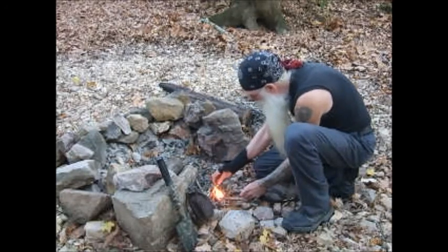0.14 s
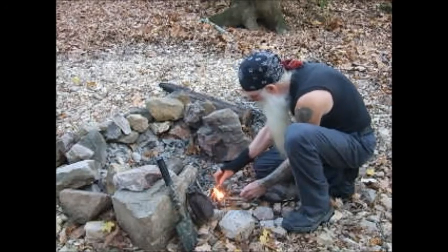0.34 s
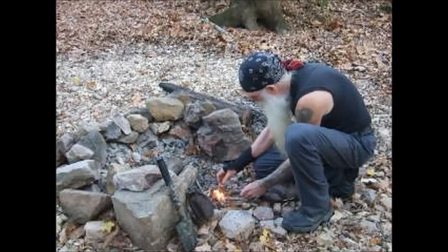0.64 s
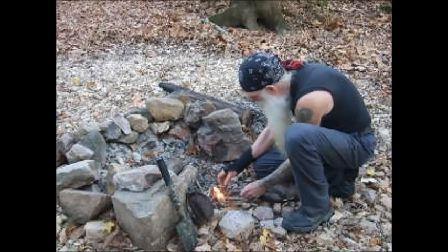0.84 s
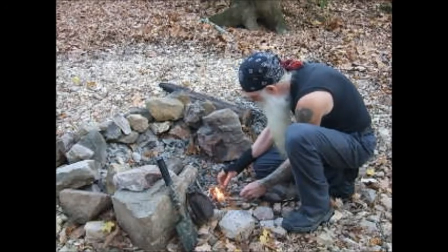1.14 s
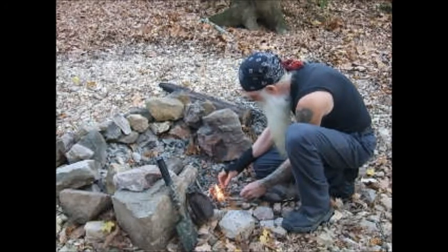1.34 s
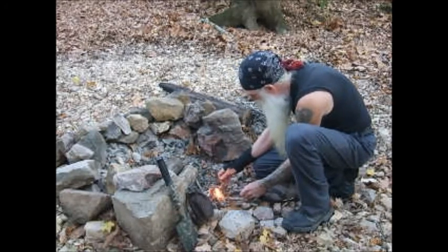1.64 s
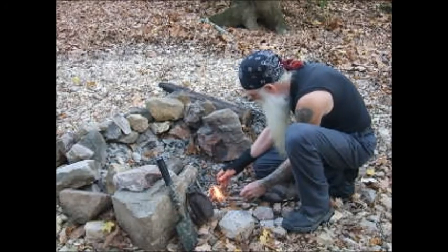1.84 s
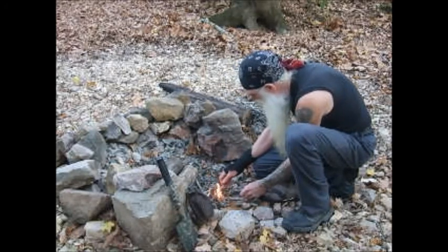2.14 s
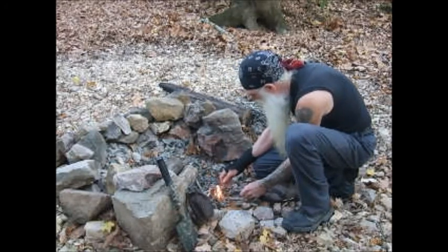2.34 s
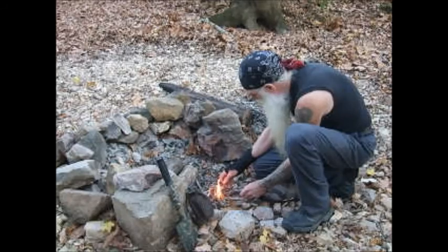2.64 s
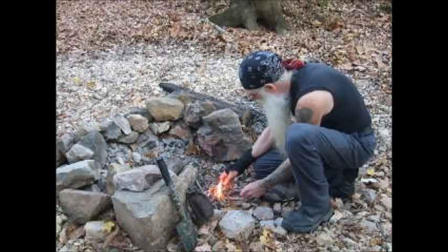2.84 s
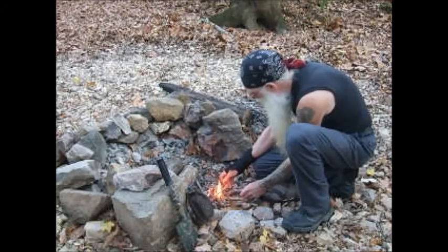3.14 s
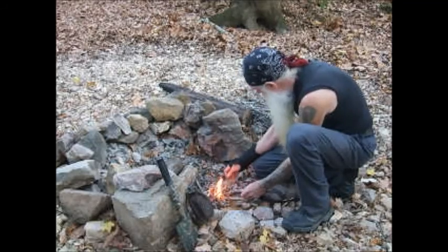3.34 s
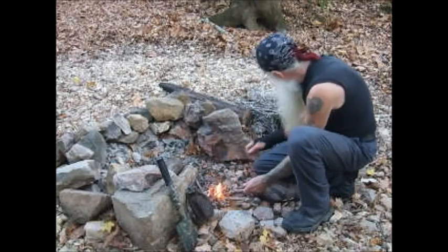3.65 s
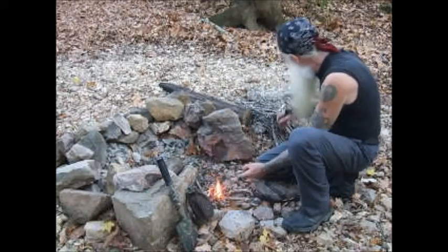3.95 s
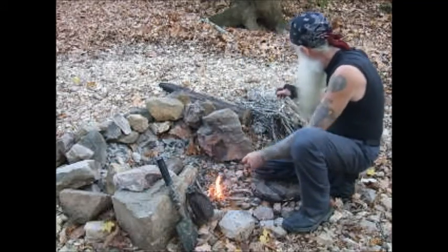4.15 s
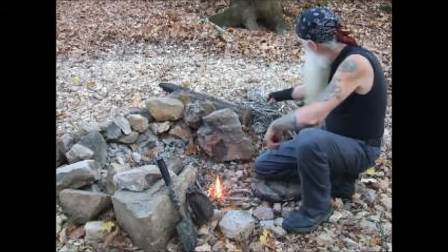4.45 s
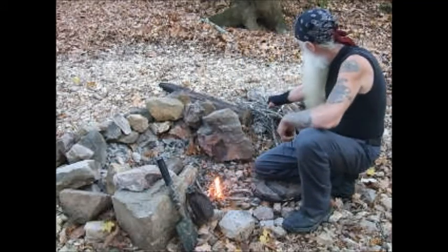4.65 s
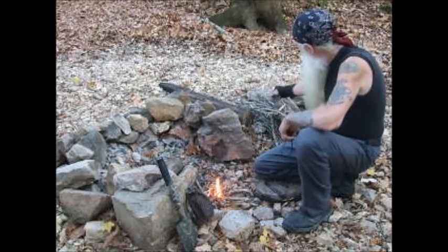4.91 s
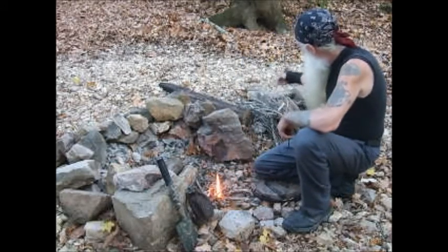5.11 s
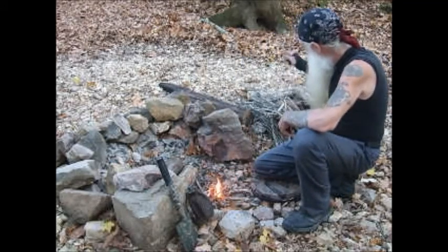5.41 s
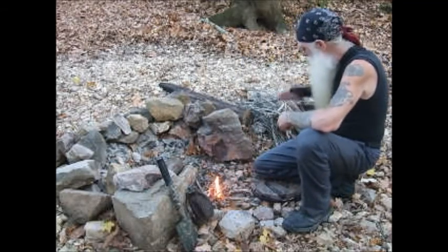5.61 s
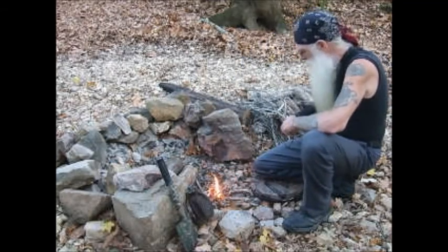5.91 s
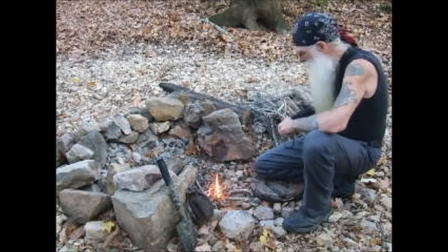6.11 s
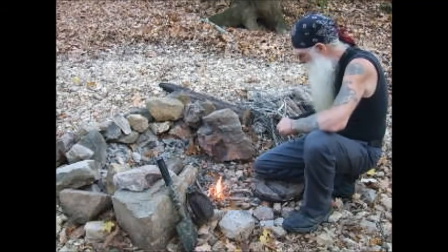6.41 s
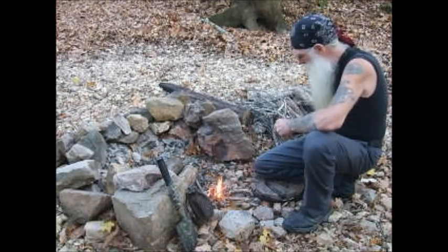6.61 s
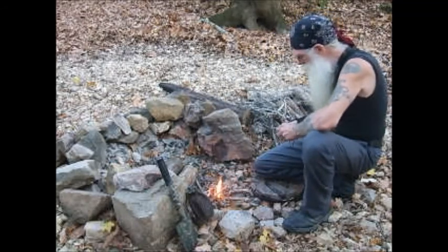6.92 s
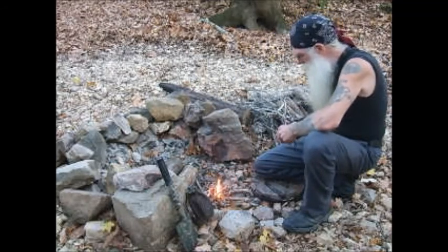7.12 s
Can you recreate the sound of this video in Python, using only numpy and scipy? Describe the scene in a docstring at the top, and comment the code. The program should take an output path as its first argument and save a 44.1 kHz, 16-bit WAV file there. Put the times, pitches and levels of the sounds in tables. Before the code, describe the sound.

A high cricket chorus in the woods, with faint fire crackles, someone rummaging through dry twigs, then a sharp, echoing crack.

```python
"""Tree crickets trill by rubbing their wings in a wood at dusk, a few near ones over a far chorus.
A small kindling fire ticks, and from 1.6 s a few thin whistles come from the trees.
At 3.4 s someone shifts on dry leaves, then reaches into a pile of twigs, which rustle, click and bump.
A stick is pulled free and bent. Near 6.9 s it breaks with a sharp snap that rings back from the trees."""
import sys
import numpy as np
from scipy import signal
from scipy.fft import rfft, irfft
from scipy.io import wavfile
from scipy.ndimage import uniform_filter1d, map_coordinates

SR = 44100
rng = np.random.default_rng(int(sys.argv[2]) if len(sys.argv) > 2 else 0)


def dump_mix(stems):
    """Bounce the given channels to the path in sys.argv[1] as a 16-bit WAV at rate SR."""
    frames = np.atleast_2d(stems).T  # one column per channel
    limited = np.clip(frames, -1, 1)  # hard clip at full scale
    pcm = np.round(limited * 32767).astype(np.int16)
    wavfile.write(sys.argv[1], SR, pcm)


N = 320607
TIME = np.arange(N) / SR
TREBLE_LIMIT_HZ = 8100

# Movements among twigs and leaves: kindling settles, a person shifts and rummages, a stick is bent.
# Each row: start in seconds, length in seconds, relative crackle level in dB, relative scrape level in dB.
MOVEMENTS = [(.145, .015, -43, -65), (.21, .03, -52, -53), (3.395, .08, -44, -43.5), (3.48, .03, -37, -50),
             (3.55, .04, -41, -51), (3.88, .15, -45, -61), (4.22, .06, -41.5, -59), (4.63, .07, -39.5, -51),
             (4.92, .3, -41.5, -49.5), (5.26, .025, -42, -45), (5.35, .06, -44, -53), (5.7, .38, -53, -61),
             (6.55, .08, -45, -72)]
# The bright tone of crackling dry wood. Each row: frequency in Hz, relative level in dB.
CRACKLE_SPECTRUM = [(1500, -26.5), (3500, -1.5), (5000, 1), (6500, 5), (7500, 7.3), (8200, -15)]


def near_crickets(echo_db=-8, faint_db=-48):
    """The nearest crickets sing overlapping trills; faint ones are farther off and arrive more as echo."""
    # Each cricket's own song. Each entry: pitch in Hz, wing strokes per second, trill length in seconds.
    songs = {"high": (4315, 39.8, .37), "bright": (4235, 38.8, .38), "middle": (4160, 39.6, .32),
             "low": (4078, 38.4, .31), "deep": (3675, 37.9, .38)}
    # Who sings when. Each row: start in seconds, name of the cricket, level in dB.
    trills = [(-.08, "low", -40), (.107, "bright", -39.5), (.16, "low", -42), (.62, "bright", -43.5),
              (.86, "low", -43.5), (.99, "high", -40.5), (1.06, "middle", -44), (1.061, "deep", -49),
              (1.48, "low", -44), (1.638, "high", -42), (1.66, "bright", -37.5), (1.855, "low", -39),
              (2.21, "high", -42), (2.32, "low", -42), (2.43, "bright", -37.5), (2.845, "low", -40),
              (3.035, "middle", -36.5), (3.563, "high", -41.5), (3.565, "low", -38), (3.569, "deep", -51.5),
              (3.941, "bright", -38), (4.14, "bright", -41), (4.38, "low", -40.5), (4.7, "bright", -43),
              (4.915, "middle", -36), (4.97, "high", -39.5), (5.33, "low", -43), (5.557, "deep", -51.5),
              (5.692, "bright", -35.5), (5.742, "high", -39.5), (5.835, "low", -38), (6.0, "middle", -43),
              (6.32, "high", -40), (6.4, "middle", -35.5), (6.5, "bright", -42.5), (7.012, "deep", -51.5),
              (7.097, "bright", -38)]
    out = np.zeros(N)
    for start, cricket, db in trills:
        hz, strokes_per_s, length = songs[cricket]
        song = np.pad(trill(length, hz, strokes_per_s), (0, SR // 10))
        echo_gain = amp(echo_db) + amp(faint_db - db) ** 2
        heard = song + echo_gain * woods(song, echo_s=.18)
        add(out, start, amp(db) * heard * np.std(song) / np.std(heard))
    return out


def trill(length, hz, strokes_per_s, sounding_share=.74, sag=.03, climb_hz_per_s=130):
    """Each closing of the wings scrapes out one pulse of tone, whose pitch sags as the wings slow."""
    t = TIME[:max(round(length * SR), 256)]
    strokes = t * strokes_per_s
    closing = np.minimum(strokes % 1 / sounding_share, 1)  # 0 is open, 1 is shut
    pitch = hz * (1 - sag * (closing - .5) + .004 * drift(t, 60.47))
    pitch += climb_hz_per_s * (t - length / 2)
    fresh_start = rng.random(256)[strokes.astype(int)]  # the wings ring afresh at every stroke
    phase = 2 * np.pi * (np.cumsum(pitch) / SR + fresh_start)
    pulse = np.abs(np.sin(np.pi * closing ** 1.08)) ** .47
    pulse *= amp(.5 * drift(t, strokes_per_s))
    effort = amp(2.2 * np.sin(np.pi * t / t[-1]))  # greatest in the middle of the trill
    fade_out = np.minimum((t[-1] - t) / .0091, 1)
    overtone = amp(-20) * np.sin(2 * phase) * (2 * hz < .97 * TREBLE_LIMIT_HZ)
    return unit(pulse * effort * fade_out * (np.sin(phase) + overtone))


def snap(scatter_s=.005, echo_s=.63):
    """The stick breaks; near stones scatter the crack and the trees return a bright echo."""
    # The stick's fibres part in quick succession.
    # Each row: start in seconds, relative peak in dB, pitch in Hz, rise time in seconds.
    fibres = [(6.8745, -7, 2620, 0.00015), (6.8746, -2.5, 5150, 0.00025), (6.8745, -7, 7500, 0.00037),
              (6.8762, -14.5, 6430, 0.00087), (6.876, -19, 4450, 0.00062), (6.8777, -24, 7600, 0.00072),
              (6.882, -21, 5860, 0.00025)]
    # The tone of the echo. Each row: frequency in Hz, relative level in dB.
    echo_spectrum = [(500, -40), (2500, -28), (3900, -19.5), (4800, -6), (5600, 1), (7400, 9), (8300, -10)]
    out, t = np.zeros(N), TIME[:SR // 2]
    for start, db, hz, rise_s in fibres:
        add(out, start, amp(db + 1) * ping(hz, rise_s))
    stones = amp(-25) * np.exp(-t / scatter_s)
    trees = amp(-32.5 - 60 * t / echo_s)
    add(out, fibres[0][0], (stones + trees) * colour(rng.standard_normal(len(t)), echo_spectrum))
    return low_cut(out, corner_hz=750)


def ticks(splinter_s=.0041, delay_s=.00081):
    """Each tick of fire or twig is a bright ping, a duller knock and a brief burst of splintering."""
    # The loudest ticks. Each row: start in seconds, relative peak in dB, pitch in Hz,
    # relative level of the knock in dB.
    loud_ticks = [(0.7072, -33, 6450, -23), (0.989, -25.5, 7260, -5), (1.0038, -28, 4890, 7.5),
                  (3.9708, -29, 6690, -25), (4.0285, -30.5, 6900, -25), (4.1882, -30, 6800, -12),
                  (4.6976, -22, 7170, -30), (4.77, -22.5, 7140, -10), (4.8208, -29, 6930, -21),
                  (4.8682, -20, 5830, -26), (4.9215, -29, 7150, -10), (4.9439, -25, 6030, -30),
                  (5.233, -26.5, 4830, -7), (5.2665, -25, 5800, -15), (5.3637, -29, 7180, -22),
                  (5.671, -27, 6880, -27), (5.7149, -28, 7100, -4), (5.911, -27, 5460, -4),
                  (6.33, -34, 6800, -11), (6.6252, -29, 7510, -6), (6.72, -32.5, 7100, -7)]
    out, t = np.zeros(N), TIME[:1024]
    for start, db, hz, knock_db in loud_ticks + small_ticks():
        noise = colour(rng.standard_normal(len(t)), CRACKLE_SPECTRUM)
        splinters = amp(-6) * noise * np.exp(-t / splinter_s)
        knock = amp(knock_db + 2.5) * ping(hz=2850, rise_s=.00015)
        add(out, start + delay_s, amp(db + 1) * (ping(hz, rise_s=.00046) + knock + splinters))
    return low_cut(out + amp(-10) * woods(out, echo_s=.2), corner_hz=900)


def small_ticks(fire_per_s=1.2, twigs_per_s=8):
    """Lists ticks that come by chance: a few from the fire, more while the twigs move."""
    busy = np.max([movement(start, length) for start, length, _, _ in MOVEMENTS], axis=0)
    starts = TIME[rng.random(N) < (fire_per_s + twigs_per_s * busy) / SR]
    chances = rng.standard_normal((len(starts), 3))
    return [(start, -37 + 2 * size, 6500 + 600 * pitch, -15 + 6 * knock)
            for start, (size, pitch, knock) in zip(starts, chances)]


def rustle(sizzle_db=-61):
    """Dry twigs and leaves crackle and rub; the fire keeps a faint sizzle going."""
    crackle_gain = np.max([amp(db - 1) * movement(s, length) for s, length, db, _ in MOVEMENTS], axis=0)
    scrape_gain = np.max([amp(db - 1) * movement(s, length) for s, length, _, db in MOVEMENTS], axis=0)
    # The duller tone of rubbing. Each row: frequency in Hz, relative level in dB.
    scrape_spectrum = [(60, -13), (200, -7), (600, -5.5), (1500, -3), (2900, 4), (4500, -5), (8000, -19.5)]
    crackle = colour(tiny_clicks(per_s=750, size_db=3.5, clump_db=2), CRACKLE_SPECTRUM)
    scrape = colour(tiny_clicks(per_s=2500, size_db=1, clump_db=5), scrape_spectrum)
    return np.hypot(crackle_gain, amp(sizzle_db)) * crackle + scrape_gain * scrape


def movement(start, length, swell_s=.035, fade_s=.045):
    """The loudness of one movement swells, holds and dies away."""
    before = np.minimum(TIME - start, 0)
    after = np.maximum(TIME - start - length, 0)
    return np.exp(before / swell_s - after / fade_s)


def tiny_clicks(per_s, size_db, clump_db):
    """Clicks of random size come in louder and softer clumps, with a very short echo."""
    clicks = rng.choice([-1, 1], N) * (rng.random(N) < per_s / SR)
    sizes = np.minimum(rng.exponential(1, N), 4)
    clicks = clicks * amp(size_db * sizes + clump_db * drift(TIME, 50))
    return clicks + .7 * woods(clicks, echo_s=.038)


def knocks():
    """Sticks and stones nudge each other with soft, hollow bumps."""
    # Each row: start in seconds, peak in dB, pitch in Hz.
    bumps = [(3.422, -43, 190), (3.422, -45, 750), (3.437, -42, 1060), (3.4635, -41, 1660),
             (5.047, -42, 1000), (5.237, -35, 3070), (5.238, -39, 1540), (5.284, -43, 1025)]
    out = np.zeros(N)
    for start, db, hz in bumps:
        add(out, start, amp(db) * ping(hz, rise_s=.0018))
    return out


def chorus(centre_hz, spread_hz, level_db, count):
    """Far crickets trill in two parts of the wood, each on its own pitch, blurred by echoes."""
    places = np.zeros((2, N))
    for k, start in enumerate(np.linspace(-.5, TIME[-1], count)):
        pitch, pace, length = rng.standard_normal(3)
        hz = centre_hz + spread_hz * np.clip(pitch, -2.5, 2.5)
        add(places[k % 2], start, trill(.5 + .067 * length, hz, strokes_per_s=38 + 1.5 * pace))
    return amp(level_db) * unit(sum(place + woods(place, echo_s=.61) for place in places))


def joining_in(near, follow_db_per_db=.38, smooth_s=.1):
    """The loudness of the far chorus swells and rests together with the near crickets."""
    window = signal.windows.hann(round(2 * smooth_s * SR))
    near_power = signal.fftconvolve(unit(near) ** 2, window / window.sum(), "same")
    return unit((np.abs(near_power) + .03) ** (follow_db_per_db / 2))


def whistles(waver_hz=130):
    """Thin, faint whistles glide unsteadily and are blurred by the trees."""
    # Each row: start in seconds, length in seconds, first and last pitch in Hz, relative level in dB.
    glides = [(1.629, 0.08, 7650, 7700, -44), (2.037, 0.016, 6480, 6700, -43),
              (3.92, 0.16, 6480, 6900, -51), (4.3, 0.2, 6450, 6760, -48), (5.61, 0.038, 4620, 4730, -44),
              (5.876, 0.13, 5320, 5280, -47.5)]
    out = np.zeros(N)
    for start, length, from_hz, to_hz, db in glides:
        t = TIME[:round(length * SR)]
        pitch = np.linspace(from_hz, to_hz, len(t)) + waver_hz * drift(t, 500)
        tone = np.sin(2 * np.pi * np.cumsum(pitch) / SR)
        add(out, start, amp(db) * unit(signal.windows.tukey(len(t), .5) * tone))
    return amp(-4) * (.89 * out + .83 * woods(out, echo_s=.24))


def background(air_db=-52, hiss_db=-47, flicker_db=1.37, dropout_s=.011):
    """Soft outdoor air lies under the flickering hiss of the farthest insects."""
    # The tones of the air and of the insects. Each row: frequency in Hz, relative level in dB.
    air_spectrum = [(25, 2), (60, 0), (110, 0), (200, -0.5), (330, -0.5), (700, -0.23), (1300, -2),
                    (2800, -1), (3500, -2.5), (4500, -21), (8000, -33)]
    insect_spectrum = [(2500, -24.5), (3500, -8), (4300, 2), (4700, 4), (5100, -0.5), (5600, -6),
                       (6500, -4.5), (7400, -4), (7800, -4.5), (8300, -73.5)]
    # The recorder lets the background noise drop out for an instant.
    # Each row: time in seconds, depth of the dropout in dB.
    dropouts = [(0.512, 9), (0.603, 6), (0.95, 7), (1.397, 4), (2.204, 4), (6.505, 6), (6.605, 14),
                (7.035, 4)]
    air = amp(air_db) * colour(rng.standard_normal(N), air_spectrum)
    hiss = amp(hiss_db + flicker_db * drift(TIME, 70)) * colour(rng.standard_normal(N), insect_spectrum)
    dropout_db = sum(depth * np.exp(-((TIME - when) / dropout_s) ** 2) for when, depth in dropouts)
    return air * amp(-dropout_db) + hiss * amp(-.6 * dropout_db)


def woods(x, echo_s, echoes_per_s=2000):
    """Echoes from trunks and leaves fade by 60 dB in echo_s; each call is another place in the wood."""
    t = TIME[:SR // 2]
    echoes = rng.standard_normal(len(t)) * (rng.random(len(t)) < echoes_per_s / SR)
    echoes *= amp(-60 * t / echo_s) * (t > .004)
    return signal.fftconvolve(x, echoes / np.linalg.norm(echoes))[:len(x)]


def ping(hz, rise_s):
    """Struck wood rings for a moment, swelling and dying."""
    t = TIME[:1024]
    return t / rise_s * np.exp(1 - t / rise_s) * np.sin(2 * np.pi * hz * t)


def low_cut(x, corner_hz):
    """Takes the bass out of a sound below corner_hz."""
    return signal.sosfilt(signal.butter(2, corner_hz, "highpass", fs=SR, output="sos"), x)


def colour(x, spectrum):
    """Shapes a sound's tone by rows of frequency in Hz and level in dB, at an average level of 1."""
    hz, db = np.transpose(spectrum)
    frequencies = np.fft.rfftfreq(len(x), 1 / SR)
    gain = amp(np.interp(np.log(frequencies + 1), np.log(hz + 1), db))
    return unit(irfft(rfft(x) * gain, len(x)))


def drift(t, per_s):
    """A smooth random wobble of size about 1."""
    return map_coordinates(rng.standard_normal(4096), [t * per_s], order=2, mode="wrap")


def amp(db):
    """Turns decibels into a number to multiply by."""
    return 10 ** (np.asarray(db) / 20)


def unit(x):
    """Scales a sound to an average (rms) level of 1."""
    return x / np.sqrt(np.mean(x ** 2) + 1e-20)


def add(mix, start_s, sound):
    """Mixes a sound in at a given time, dropping what does not fit."""
    start = round(start_s * SR)
    sound = sound[max(-start, 0):]
    part = mix[max(start, 0):][:len(sound)]
    part += sound[:len(part)]


def gain_control(x, threshold_db=-20, share=.22, recover_db_per_s=4, lag_s=.008):
    """A loud peak turns the recorder's volume down a moment later; it creeps back slowly."""
    power_db = 10 * np.log10(np.abs(uniform_filter1d(x[0] ** 2, size=128)) + 1e-12)
    excess_db = np.maximum(power_db - threshold_db, 0)
    recovery_db = TIME * recover_db_per_s
    cut_db = np.maximum.accumulate(share * excess_db + recovery_db) - recovery_db
    smooth_cut_db = uniform_filter1d(cut_db, size=256)
    return x * amp(-np.interp(TIME - lag_s, TIME, smooth_cut_db))


def scene():
    """Crickets near and far, the fire and the twigs, mixed into one channel."""
    near = near_crickets()
    far = joining_in(near) * chorus(centre_hz=4090, spread_hz=108, level_db=-41.7, count=260)
    shrill = chorus(centre_hz=4630, spread_hz=190, level_db=-57, count=90)
    dusk = near + far + shrill + background() + whistles()
    return (dusk + rustle() + knocks() + snap() + ticks())[None]


def record(dry, offset=-.0036, top_hz=15800):
    """The recorder loses the high treble, rests slightly off zero and clips anything past full scale."""
    treble_cut = signal.firwin(301, TREBLE_LIMIT_HZ, window=("kaiser", 8), fs=SR)[None]
    smoothing = signal.firwin(301, top_hz, window=("kaiser", 8), fs=SR)[None]
    dulled = signal.oaconvolve(gain_control(dry), treble_cut, "same")
    return signal.oaconvolve(np.clip(dulled + offset, -1, 1), smoothing, "same")


dry = scene()
out = record(dry)
dump_mix(out)
```